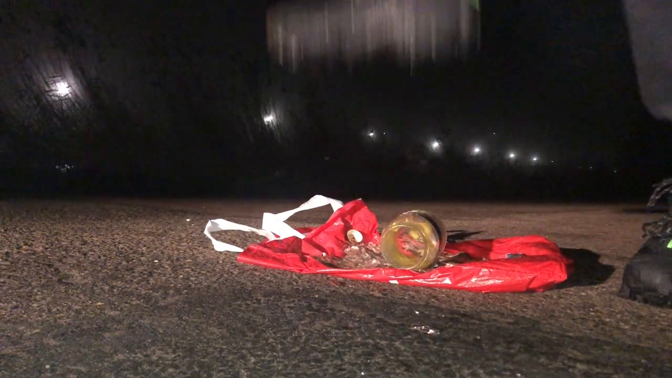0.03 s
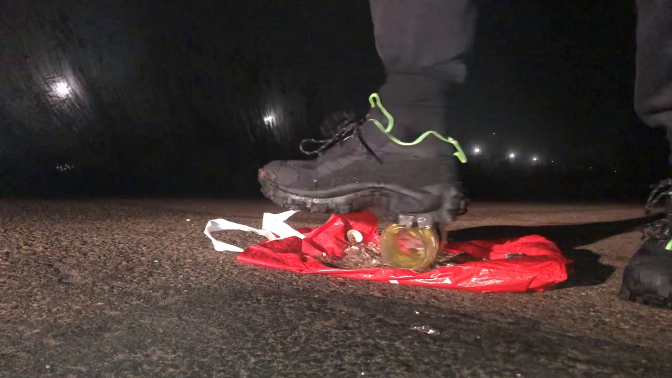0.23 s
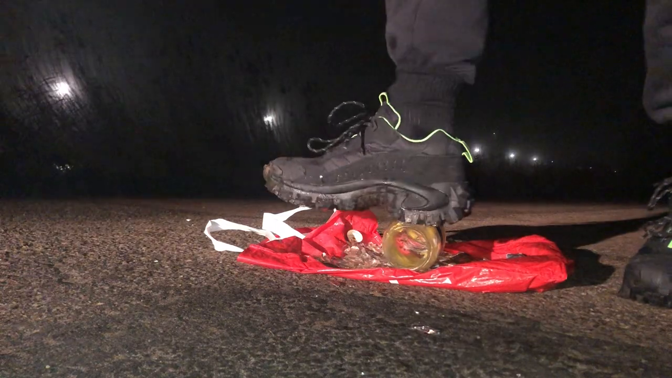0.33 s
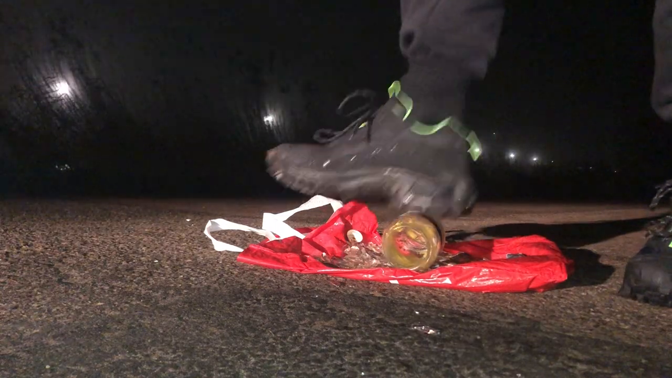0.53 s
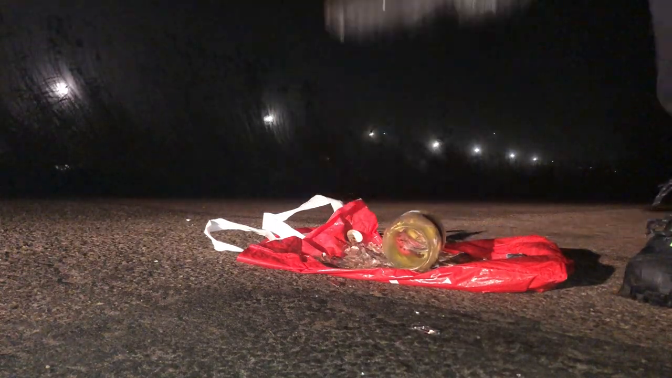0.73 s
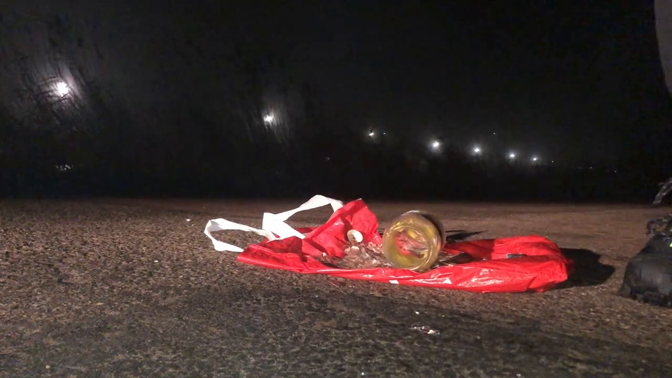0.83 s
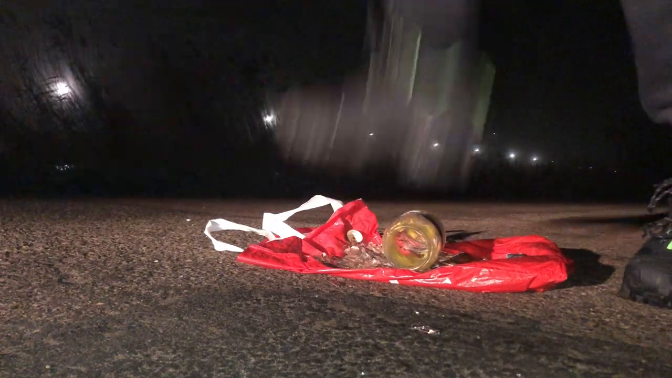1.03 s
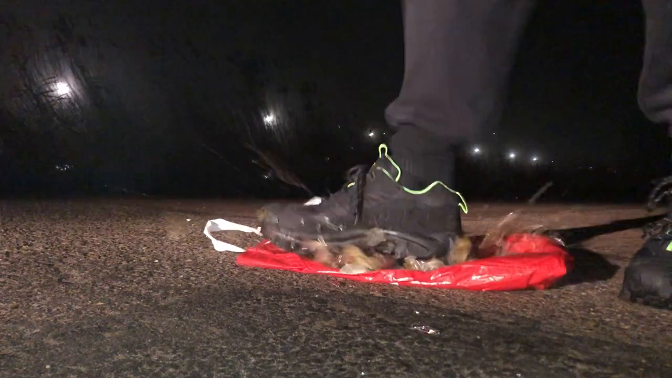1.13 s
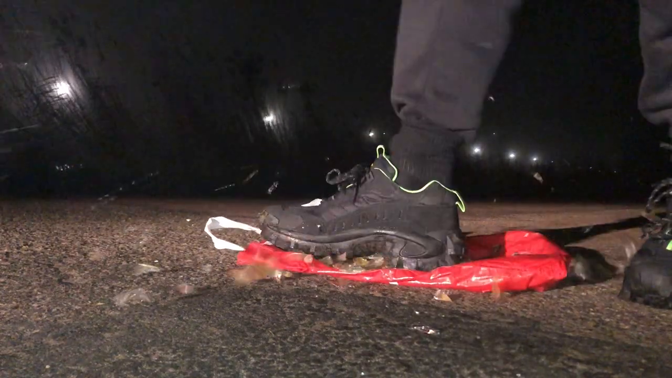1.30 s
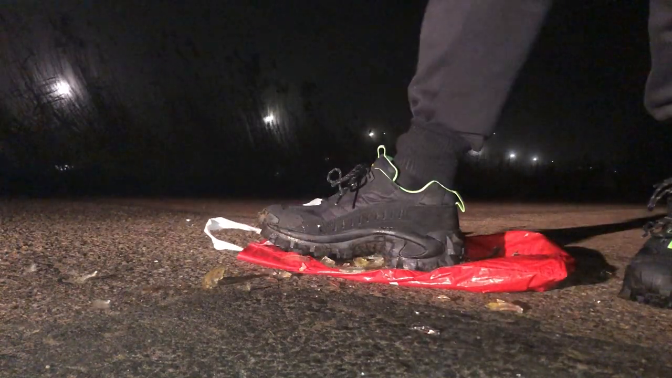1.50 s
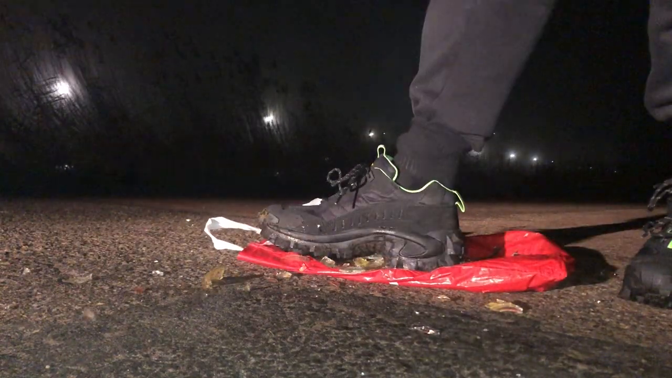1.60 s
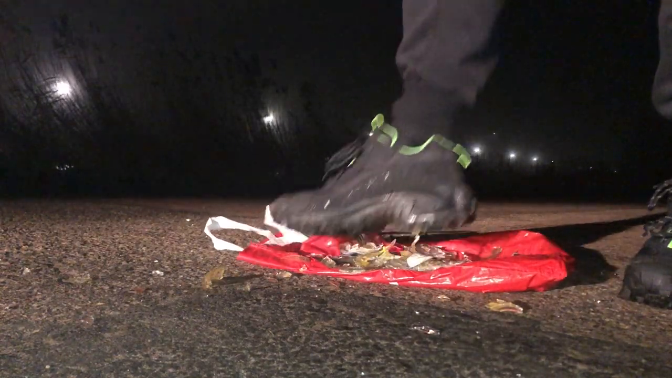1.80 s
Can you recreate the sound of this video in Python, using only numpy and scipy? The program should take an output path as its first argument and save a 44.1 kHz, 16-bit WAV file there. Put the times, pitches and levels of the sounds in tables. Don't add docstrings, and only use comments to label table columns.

```python
import sys
import numpy as np
from scipy import signal
from scipy.fft import rfft, irfft, next_fast_len
from scipy.io import wavfile
from scipy.ndimage import uniform_filter1d, map_coordinates

SR = 44100
rng = np.random.default_rng(int(sys.argv[2]) if len(sys.argv) > 2 else 0)


def level_to_linear(level):
    exponent = np.asarray(level, float) / 20
    return 10 ** exponent


def materialize(psi):
    bounded = np.clip(np.atleast_2d(psi).T, -1, 1)
    quanta = np.round(bounded * 32767).astype(np.int16)
    wavfile.write(sys.argv[1], SR, quanta)


N = 83790


def unit(x):
    return x / np.sqrt(np.mean(x ** 2) + 1e-20)


def along(points, hz):
    f, v = np.transpose(points)
    return np.interp(np.log(hz + 1), np.log(f + 1), v, left=-120, right=-120)


def filtered(x, response):
    m = next_fast_len(N + 8192)
    return irfft(rfft(x, m) * response(np.fft.rfftfreq(m, 1 / SR)), m)[:N]


def wobble(rate):
    knots = rng.standard_normal(int(N * rate / SR) + 4)
    return map_coordinates(knots, [np.arange(N) * rate / SR])


def add(track, s, sound):
    part = track[round(s * SR):][:len(sound)]
    part += sound[:len(part)]


def ring(hz, db, t60, attack=0.00026):
    t = np.arange(int(SR * t60 * 1.2) + 16) / SR
    return level_to_linear(db - 60 * t / t60) * (1 - np.exp(-t / attack)) * np.sin(2 * np.pi * hz * t)


def tick(hz, db):
    u = np.arange(-40, 41) / SR * hz
    return level_to_linear(db) * np.exp(-(u / 0.41) ** 2) * np.cos(2 * np.pi * u + 0.62)


def grains(colour, count, size=64):
    when, pitch, loud = rng.random((3, count, 1))
    f = np.transpose(colour)[0]
    turns = f[0] * (f[-1] / f[0]) ** pitch ** .6 * np.arange(size) / SR
    spread_db, decay_cycles = 3, 2.5
    bits = level_to_linear(-spread_db * np.log(loud + 0.0014)) * np.sin(2 * np.pi * turns)
    bits = bits * np.exp(-turns / decay_cycles) * np.hanning(2 * size)[size:]
    places = (when * N).astype(int) + np.arange(size)
    bed = np.bincount(places.ravel(), bits.ravel(), N + size)[:N]
    spectrum = uniform_filter1d(np.abs(rfft(bed)) ** 2, size=2000) ** .5
    hz = np.fft.rfftfreq(N, 1 / SR)
    return unit(irfft(rfft(bed) / spectrum * level_to_linear(along(colour, hz)), N))


def bursts(rows):
    t, power = np.arange(N) / SR, np.zeros(N)
    for s, db, rise, t60 in rows:
        u = np.maximum(t - s, 0)
        power += (level_to_linear(db - 60 * u / t60) * (1 - np.exp(-u / rise))) ** 2
    return np.sqrt(power)


# t/s, level/dB
BACKGROUND_GAIN = [(0, -2), (.3, 0.5), (1.15, -2), (1.2, -2), (1.42, -12.5), (1.9, -7)]
# multiple of firing rate, level/dB
EXHAUST_ORDERS = [(3, -1.5), (4, -10), (5, -2.5), (6, -0.5), (8, 0.5), (10, 1), (12, -6.5), (13, -1),
                  (14, -8), (16, -8)]
# f/Hz, level/dB per Hz
RUMBLE_COLOUR = [(15, -35), (45, -2), (150, -6.5), (350, -10), (560, -12), (680, -17.5), (2000, -23.5),
                 (16500, -45.5)]
# f/Hz, width/Hz, level/dB
HOUSING_RESONANCES = [(513.6, 11.5, -55), (793.7, 35, -63.5), (1680, 300, -59), (3290, 400, -62.5),
                      (4190, 630, -66)]


def generator():
    t = np.arange(N) / SR
    firing_hz, first_firing_s = 24.11, 0.00944
    turn = 2 * np.pi * firing_hz * (t - first_firing_s)
    out = np.zeros(N)
    for k, db in EXHAUST_ORDERS:
        level = level_to_linear(-52.5 + db - 2.5 * wobble(6))
        out += level * np.cos(k * turn + .3 * wobble(5))
    rumble = unit(filtered(rng.standard_normal(N), lambda f: level_to_linear(along(RUMBLE_COLOUR, f))))
    out += rumble * level_to_linear(-47 + 0.84 * wobble(7.67))
    for hz, w, db in HOUSING_RESONANCES:
        level = level_to_linear(db + 1.86 * wobble(7.09))
        band = filtered(rng.standard_normal(N), lambda f: 1 / (1 + (2 * (f - hz) / w) ** 2))
        out += level * unit(band)
    return out * level_to_linear(np.interp(t, *np.transpose(BACKGROUND_GAIN)))


# t/s, level/dB, T60/s
CRACK_BURSTS = [(0.2073, -22, 0.18), (0.2186, -12, 0.018), (0.224, -22, 0.11), (0.2798, -20, 0.028),
                (0.3612, -28.5, 0.075), (.4047, -38, .04), (0.4283, -33.5, .03), (0.441, -41, 0.03),
                (0.4526, -29.5, .03), (.461, -40, .06), (.48, -42, .03), (0.523, -48, .03),
                (.5337, -37.5, .035), (.542, -44, .08), (.555, -44, .04), (.563, -45, .03),
                (1.5775, -40, .02), (1.5805, -41, .015), (1.1346, -42.5, 0.11), (1.1527, -21, 0.035),
                (1.1587, -8, 0.0095)]
# t/s, level/dB, rise/s, T60/s
SWELLING_BURSTS = [
    (.315, -48.5, 0.017, 0.9),
    (.351, -40, 0.006, 0.1),
    (0.39, -40, 0.008, 0.15),
    (1.163, -20, 0.0012, .045),
    (1.177, -23, 0.006, 0.15),
    (1.575, -52, .005, 0.11),
    (1.744, -45, 0.0073, 0.11),
]
# f/Hz, level/dB per Hz
GRIT_COLOUR = [(1200, -18), (2800, -1.5), (6000, -2.5), (13000, 0), (15700, -0.5)]


def splinters(clumps):
    crack_rise_s = .0004
    cracks = [(s, db, crack_rise_s, t60) for s, db, t60 in CRACK_BURSTS]
    return clumps * grains(GRIT_COLOUR, count=16000) * bursts(SWELLING_BURSTS + cracks)


def wall_rattle(grit):
    rattle_until_s, rattle_db, rattle_t60 = .62, -6, .022
    wall = sum(ring(hz, db, rattle_t60) for hz, (db, t60) in zip(WALL_HZ, WALL_MODES))
    drive = grit * (np.arange(N) < rattle_until_s * SR)
    return level_to_linear(rattle_db) * signal.fftconvolve(drive, wall / np.linalg.norm(wall))[:N]


# t/s, level/dB, rise/s, T60/s
CRUSH_BURSTS = [
    (.2075, -19.5, .002, 0.11),
    (.2805, -32.5, 0.00079, 0.078),
    (1.146, -36.5, 0.0041, .05),
    (1.16, -24.5, 0.00091, 0.021),
    (1.1795, -20.5, 0.003, 0.075),
    (1.204, -35.5, 0.0056, 0.3),
    (1.337, -41, 0.0032, 0.042),
    (1.748, -49, .008, .12),
]
# f/Hz, level/dB per Hz
RUBBLE_COLOUR = [(150, -12.5), (500, -3), (1300, 4), (4500, -6.5), (8000, -26)]


def rubble(clumps):
    return clumps * grains(RUBBLE_COLOUR, count=10000) * bursts(CRUSH_BURSTS)


WALL_HZ = [2460, 4037, 5060, 5546, 5790, 6890, 7652, 7990, 8405, 8540, 9660, 11070, 12950, 14400]
# level/dB, T60/s
WALL_MODES = [(-11, .22), (-16, .14), (-10, .16), (-6, .16), (-12, .35), (-9, .11), (-13, .1), (-17, .1),
              (-9, .05), (-9, .055), (-15, .045), (-14, .035), (-10, .035), (-13, .035)]
# t/s, wall level/dB, air level/dB, air f/Hz
JAR_CONTACTS = [
    (.208, -27.5, -24, 385),
    (0.2186, -27, -19, 398),
    (.2315, -36, -19, 402),
    (.2375, -24, -40, 402),
    (0.2808, -17, -23.5, 392),
    (.362, -27, -37, 410),
    (0.4289, -40, -38, 418),
    (.453, -39, -30.5, 423),
    (0.5349, -40.5, -32.5, 422),
]


def jar():
    scatter_db, loose_after_s, long_t60, long_loss_db = 2, .25, .095, 19
    out = np.zeros(N)
    chance = rng.standard_normal((len(JAR_CONTACTS), len(WALL_MODES)))
    for (s, wall_db, air_db, air_hz), row in zip(JAR_CONTACTS, chance):
        for hz, (db, t60), z in zip(WALL_HZ, WALL_MODES, row):
            loss_db = long_loss_db * (s > loose_after_s and t60 > long_t60)
            add(out, s, ring(hz, wall_db + db - loss_db + scatter_db * z, t60))
        add(out, s, ring(air_hz, air_db, t60=.1, attack=0.002))
    return out * level_to_linear(1.2 * wobble(151.7))


# t/s, f/Hz, level/dB, T60/s
KNOCK_BLOWS = [(0.2085, 1062, -1, 0.015), (0.21, 252, -5, 0.028), (0.2305, 1250, -13, 0.012),
               (.2125, 506, -15.5, 0.034), (.2805, 954, -15.5, 0.014), (0.295, 1500, -25.5, 0.014),
               (.2806, 2950, -13, 0.014), (.3622, 2950, -27, 0.033), (.3615, 1150, -30, .02),
               (.453, 1050, -38, .015), (.2085, 2950, -18, .015), (.227, 2950, -21, .03),
               (.2115, 370, -7, .022), (1.341, 1000, -40, .02), (1.753, 4100, -40.5, .02),
               (1.004, 254, -37.5, 0.085), (1.014, 115, -29, 0.043), (1.1362, 1900, -19, 0.0035),
               (1.1536, 1090, -2, 0.019), (1.157, 273, -8, 0.027), (1.156, 141.3, -29, 0.075),
               (1.1595, 1700, -1, 0.0055), (1.1605, 720, -8, 0.012), (1.195, 1080, -18.5, 0.011),
               (1.1535, 3100, -14, 0.011), (1.1575, 467, -13.5, 0.025)]


def knocks():
    out = np.zeros(N)
    for s, hz, db, t60 in KNOCK_BLOWS:
        add(out, s, ring(hz, db, t60, attack=0.33 / hz))
    return out


# t/s, level/dB, centre f/Hz
GRIT_TICKS = [(0.6502, -27, 8920), (0.7023, -27.5, 9600), (1.3495, -32, 13000), (1.3675, -22, 9000),
              (1.394, -29, 4050), (1.4097, -19, 6200), (1.448, -25.5, 6130), (1.471, -20, 11000),
              (1.4885, -27, 10000), (1.545, -36, 10000), (1.563, -28, 9000), (1.584, -34, 4200),
              (1.261, -32, 12000), (1.2777, -30, 5000), (1.36, -28, 4500), (1.379, -30, 12000),
              (1.436, -32, 5000), (1.483, -38, 8000), (1.511, -38, 2600), (1.519, -38, 12000),
              (1.609, -40, 9000), (1.618, -42, 10000), (1.641, -34, 11000), (1.676, -36, 5000),
              (1.716, -41, 5000), (1.734, -40, 11000), (1.7885, -40, 3700), (1.81, -44, 10000),
              (1.86, -44, 10000), (1.868, -42, 3000), (1.595, -34, 11140), (1.602, -25, 5370),
              (1.667, -40, 7000), (1.697, -28.5, 10000), (1.7428, -25, 6940)]


def grit_ticks():
    out = np.zeros(N)
    for s, db, hz in GRIT_TICKS:
        add(out, s - 40 / SR, tick(hz, db))
    return out


# t/s, f/Hz, level/dB, T60/s
SHARD_LANDINGS = [(1.31, 5610, -42.5, 0.13), (1.367, 5630, -39, .025), (1.387, 5640, -47, 0.22),
                  (1.428, 5630, -47, 0.28), (1.49, 5625, -52, .15), (1.424, 12350, -49, 0.1),
                  (1.437, 12440, -46, .12), (1.394, 9600, -46, .06), (1.544, 6120, -50, .04),
                  (1.625, 6110, -57, .06), (1.588, 12430, -50, .1), (1.809, 6090, -57, .04),
                  (1.448, 6100, -33, 0.02), (1.4535, 6100, -29, 0.075), (1.521, 4460, -50.5, 0.089),
                  (1.563, 12430, -43, 0.06), (1.641, 12420, -42, 0.038), (1.676, 6125, -50, 0.09),
                  (1.6955, 6110, -45, 0.09)]
# t/s, f/Hz, level/dB, T60/s
SPLINTER_GLINTS = [(1.204, 11100, -26.5, .03), (1.206, 4500, -33, .04), (1.22, 10300, -37, .02),
                   (1.278, 11250, -32.5, .02), (1.3, 9600, -39, .03), (1.303, 14200, -40, .012),
                   (1.331, 9400, -39, .01), (1.334, 11000, -29, .035), (1.349, 10880, -32, .018),
                   (1.36, 13300, -39, .012), (1.3675, 14200, -16, .013), (1.368, 11100, -35, .012),
                   (1.376, 12000, -38, .01), (1.381, 8230, -28, .018), (1.381, 15100, -33, .012),
                   (1.394, 10800, -33, .025), (1.395, 13300, -33, .022), (1.395, 15500, -33, .012),
                   (1.41, 15300, -33, .015), (1.4165, 15420, -25, .016), (1.421, 8340, -35.5, .015),
                   (1.436, 14000, -25, .025), (1.448, 10360, -33, .018), (1.448, 8200, -39, .015),
                   (1.452, 14700, -41, .025), (1.471, 15400, -34, .01), (1.489, 15200, -32, .02),
                   (1.508, 15300, -44, .02), (1.603, 15500, -44, .03), (1.624, 14700, -50, .04),
                   (1.674, 14700, -53, .03), (1.696, 14700, -41, .014), (1.696, 10200, -47, .012),
                   (1.726, 10400, -52, .025), (1.742, 15500, -46, .02), (1.875, 12500, -50, .02)]


def shards():
    twin_ratio, twin_db = 1.035, -9
    out = np.zeros(N)
    for s, hz, db, t60 in SHARD_LANDINGS:
        add(out, s, ring(hz, db, t60, attack=0.00019))
    for s, hz, db, t60 in SPLINTER_GLINTS:
        add(out, s, ring(hz, db, t60, attack=0.0003))
        add(out, s, ring(hz * twin_ratio, db + twin_db, t60, attack=0.0003))
    return out * level_to_linear(2.1 * wobble(250))


# t/s, level/dB, rise/s, T60/s
CRUMB_BURSTS = [
    (1.21, -44.5, 0.037, 1.18),
    (1.8, -60, 0.025, .7),
]


def crumbs():
    return level_to_linear(2.2 * wobble(120)) * grains(GRIT_COLOUR, count=4000) * bursts(CRUMB_BURSTS)


def strays(count=520):
    from_s, to_s, level_db, fade_db = 1.22, 1.9, -51, 18
    out = np.zeros(N)
    for when, pitch, size, life in rng.random((count, 4)):
        late = when ** 2
        s = from_s + (to_s - from_s) * late
        hz = 4000 + 11500 * pitch
        db = level_db + 12 * size ** 2 - fade_db * late
        sound = tick(hz, db + 10) if life < .4 else ring(hz, db + 5, .016 * life)
        add(out, s, sound)
    return out


def surroundings(x):
    echo_db, echo_t60 = -20, .08
    t = np.arange(SR // 4) / SR
    tail = rng.standard_normal(len(t)) * level_to_linear(-60 * t / echo_t60) * (t > .002)
    return level_to_linear(echo_db) * signal.fftconvolve(x, tail / np.linalg.norm(tail))[:N]


def scene():
    background = generator()
    clumps = level_to_linear(1.5 * wobble(250))
    bright = splinters(clumps)
    near = bright + wall_rattle(bright) + rubble(clumps) + jar() + knocks()
    near = near + grit_ticks() + shards() + crumbs() + strays()
    return (near + surroundings(near) + background)[None]


def band_limit(x):
    return signal.sosfilt(signal.butter(12, 16800, fs=SR, output="sos"), x)


def record(dry):
    low_cut_hz, top_hz, clip_top, clip_knee = 60, 15900, .72, 4
    heard = filtered(dry[0], lambda f: 1j * f / (low_cut_hz + 1j * f) / (1 + (f / top_hz) ** 90))[None]
    mix = heard / (1 + np.abs(heard / clip_top) ** clip_knee) ** (1 / clip_knee)
    return band_limit(mix)


dry = scene()
out = record(dry)
materialize(out)
```